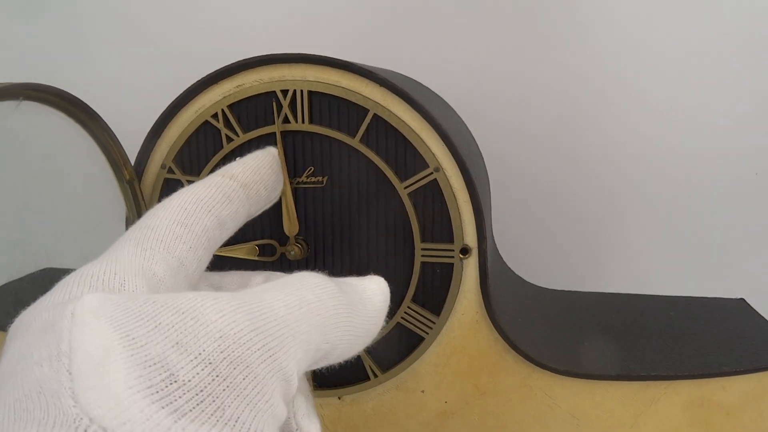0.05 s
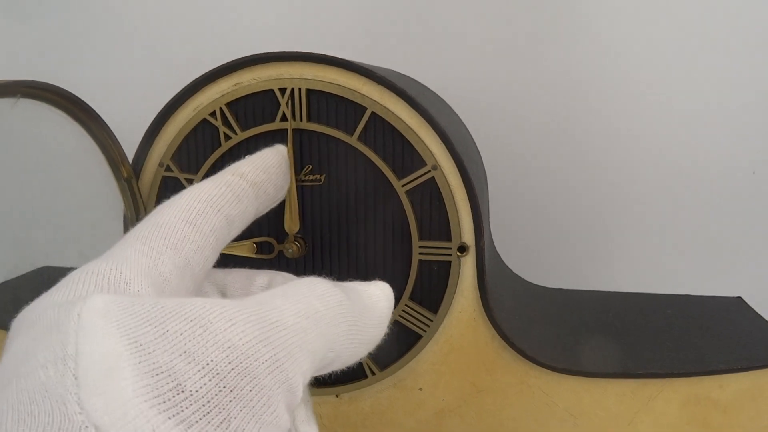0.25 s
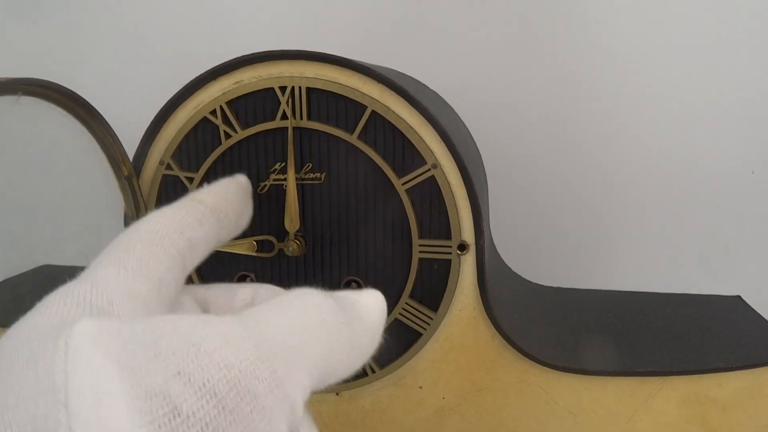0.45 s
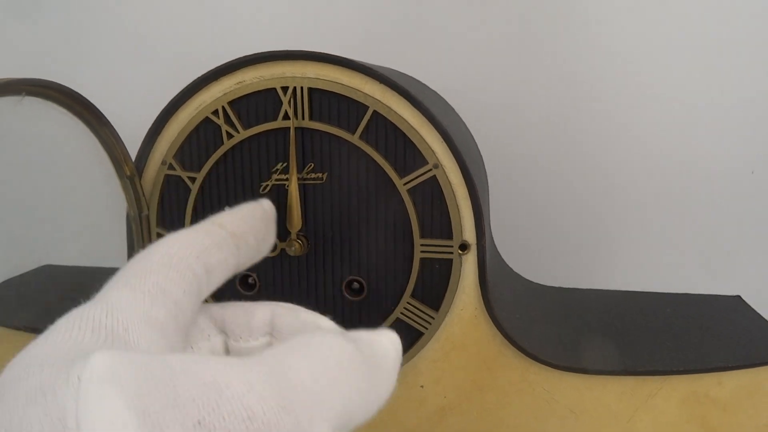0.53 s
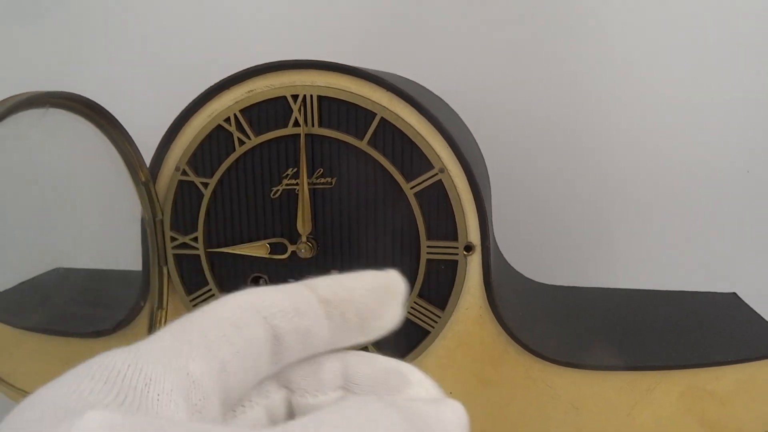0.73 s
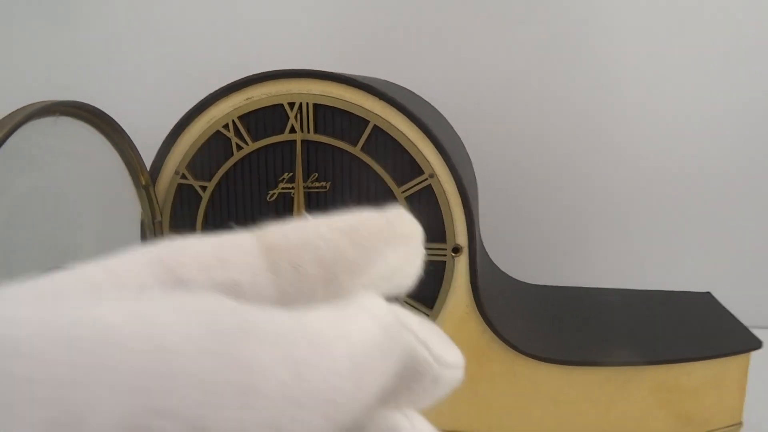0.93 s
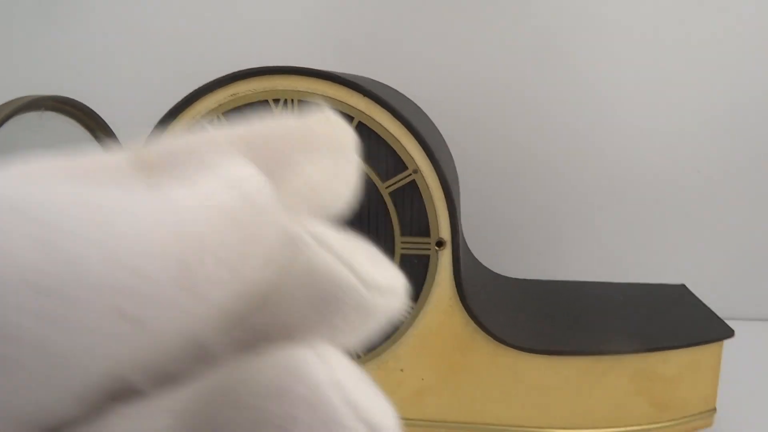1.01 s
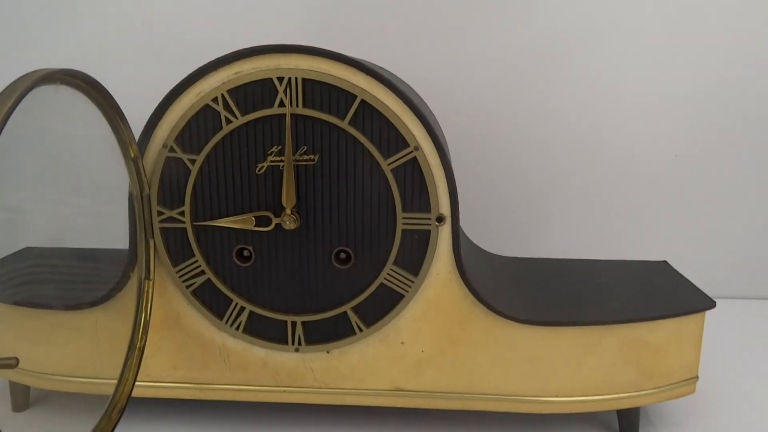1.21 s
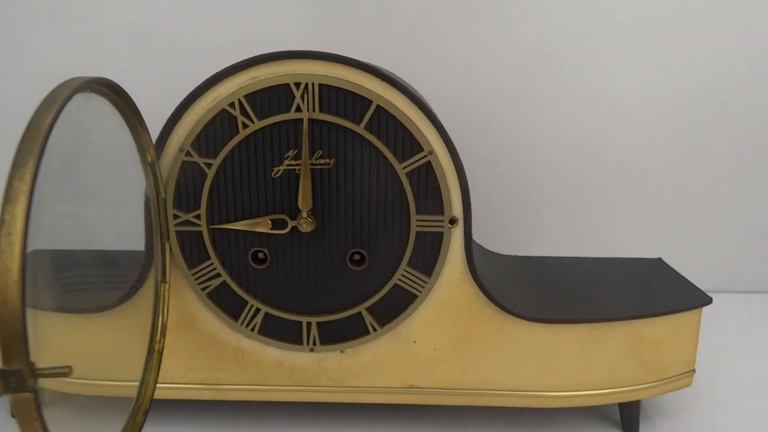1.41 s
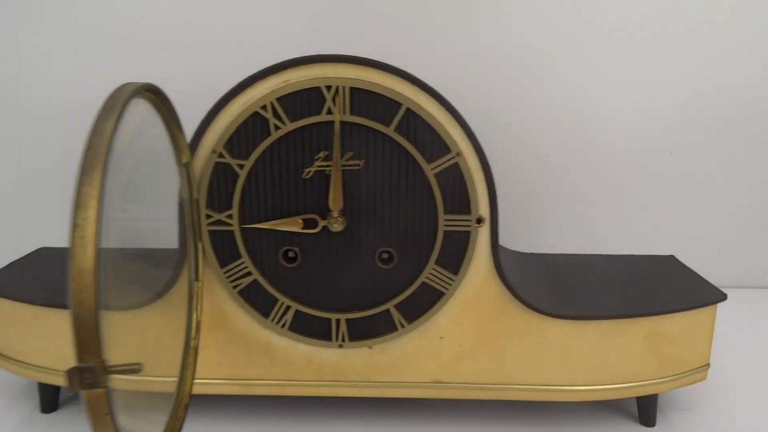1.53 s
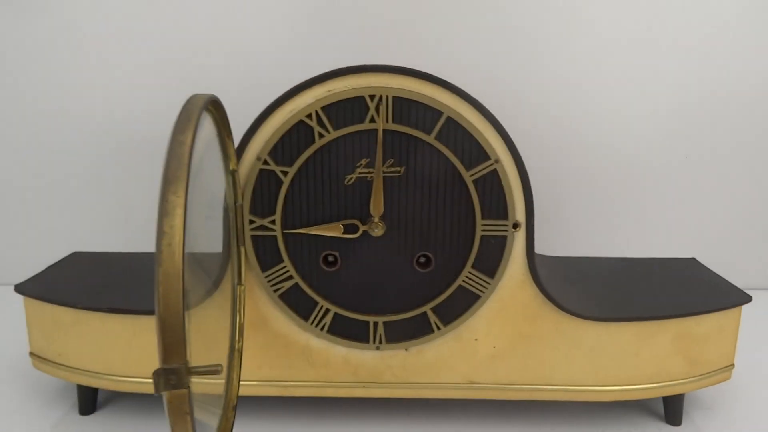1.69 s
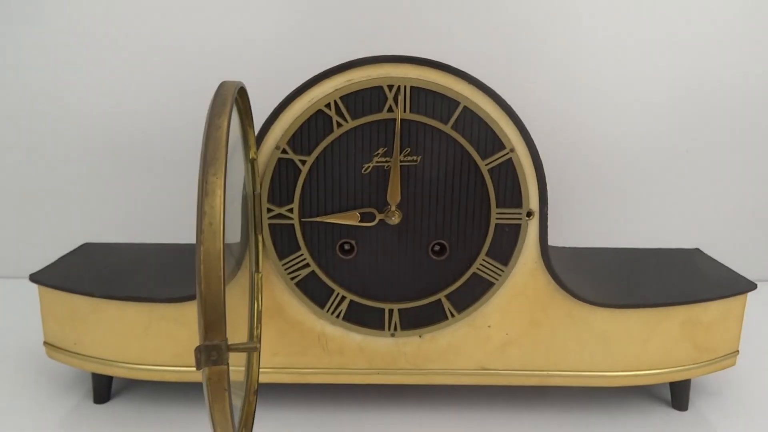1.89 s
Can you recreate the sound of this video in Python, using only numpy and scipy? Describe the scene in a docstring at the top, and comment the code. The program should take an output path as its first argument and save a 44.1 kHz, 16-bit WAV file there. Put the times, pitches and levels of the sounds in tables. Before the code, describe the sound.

A mantel clock's mechanism gives a sharp, rattling metallic click at about 0.2 seconds, with a tiny high squeak and a short ring. From 0.4 seconds it ticks faintly, four or five times a second. The glass door's hinge makes a lighter double click near 1.4 seconds and a soft knock at 1.75. A low hum and a very faint whirr with high chirps lie underneath in the small quiet room.

```python
"""A small quiet room with a low hum, where a gloved finger sets the minute hand of a wooden mantel clock.
A lever inside slips, drops, rattles and squeaks, ringing the metal plates and the case. The escapement,
the part that keeps time, ticks faintly. The glass door gives a quick double click as it starts to swing,
then knocks softly. A faint whirr with high chirps, probably a camera's focus motor, runs underneath."""
import sys
import numpy as np
from scipy import signal
from scipy.fft import rfft, irfft
from scipy.io import wavfile
from scipy.ndimage import uniform_filter1d

SR = 44100
rng = np.random.default_rng(int(sys.argv[2]) if len(sys.argv) > 2 else 0)


def store_wav(level_fs):
    """Save 16-bit WAV to argv[1]."""
    pcm = np.round(np.clip(np.atleast_2d(level_fs), -1, 1) * 32767)
    wavfile.write(sys.argv[1], SR, pcm.T.astype(np.int16))


N = 85995
T = np.arange(N) / SR
FREQS_HZ = np.maximum(np.fft.rfftfreq(N, 1 / SR), 1)
NARROW_DB, WIDE_DB = -14.5, -8.5  # how much a noise differs between the ears


def amp(db):
    """Turn decibels into a gain."""
    return 10 ** (np.asarray(db) / 20)


def curve(rows):
    """Join (time_s, level_db) points with straight lines."""
    return np.interp(T, *np.array(rows).T)


def colour(points):
    """A tone colour: how strong each frequency is compared with the others."""
    hz, db = np.array(points).T
    return amp(np.interp(np.log(FREQS_HZ), np.log(hz), db))


def noise(gain, width_db):
    """Stereo noise of level 1 in a given colour; the bass is alike in both ears."""
    mid, side = rfft(rng.standard_normal((2, N))) * gain
    side = side * amp(width_db) * FREQS_HZ / (FREQS_HZ + 100)
    out = irfft(np.array([mid + side, mid - side]), N)
    return out / out.std()


def wander(rate_hz):
    """A smooth random drift, mostly between -1 and 1."""
    knots = uniform_filter1d(np.repeat(rng.standard_normal(2048), 4), size=4)
    return 1.2 * np.interp(8 * rate_hz * T, np.arange(len(knots)), knots)


def strike(start_s, fade_s, rise_s):
    """The loudness of a hit: it rises fast and falls 60 dB in fade_s."""
    age = np.maximum(T - start_s, 0)
    return np.minimum(age / rise_s, 1) * np.exp(-np.log(1000) * np.minimum(age / fade_s, 10))


def ring(notes, hits):
    """An object's own notes fade away; each (start_s, level_db) hit tops up their energy."""
    out, first = np.zeros(N), int(hits[0][0] * SR)
    span = slice(first, first + N // 4)
    t = T[span]
    for hz, db, fade_s in notes:
        energy = sum((t > start) * amp(hit_db - 60 * np.maximum(t - start, 0) / fade_s) ** 2
                     for start, hit_db in hits)
        out[span] += amp(db) * np.sqrt(energy) * np.sin(2 * np.pi * hz * (t - t[0]))
    return out


# The hum's notes: pitch_hz, level_db
HUM_NOTES = [(70, -63.5), (106, -67)]
# How those notes swell: time_s, gain_db
HUM_SWELL = [(0, -4), (.6, -0.5), (1.95, 4)]
# The rustle's loudness: time_s, level_db
RUSTLE_LOUDNESS = [(0, -72.5), (.4, -66), (.6, -60.5), (.8, -61), (1.0, -64), (1.19, -69), (1.32, -59),
                   (1.55, -60.5), (1.95, -60.5)]
# The rustle's colour: pitch_hz, gain_db
RUSTLE_COLOUR = [(40, -5.5), (130, -3), (220, -9.5), (330, -1), (480, -11.5), (900, -19.5), (2000, -36)]
# The colour of the room's air: pitch_hz, gain_db
AIR_COLOUR = [(25, -9), (60, -12.5), (130, 1), (200, -10), (500, -14.5), (800, -9.5), (1200, -11),
              (2000, -15.5), (4000, -22), (9000, -23.5), (16000, -28.5)]

def background():
    """Still air, a hum that wavers in pitch, and a low rustle that comes and goes."""
    hum = 0
    for hz, db in HUM_NOTES:
        pitch_hz = hz * (1 + 0.028 * wander(9.7))
        hum += amp(db) * np.sqrt(2) * np.sin(2 * np.pi * np.cumsum(pitch_hz) / SR)
    rustle = amp(curve(RUSTLE_LOUDNESS)) * noise(colour(RUSTLE_COLOUR), WIDE_DB)
    air = amp(-63) * noise(colour(AIR_COLOUR), WIDE_DB)
    return amp(curve(HUM_SWELL)) * hum + rustle + air


# Pitches where the motor whirrs most: pitch_hz, width_hz, gain_db
WHIRR_PEAKS = [(1210, 200, 0), (2090, 384, 1), (3320, 280, -5), (4260, 190, -9), (5390, 460, -3.5),
               (9900, 690, -8)]
# The whirr's loudness: time_s, level_db
WHIRR_LOUDNESS = [(0, -73), (.38, -67.5), (.6, -64.5), (.85, -63), (1.1, -63.5), (1.42, -60.5),
                  (1.58, -63.5), (1.73, -59.5), (1.95, -62.5)]
# The chirps' loudness: time_s, level_db
CHIRP_LOUDNESS = [(0, -85), (.38, -87), (.42, -65), (.55, -63.5), (.8, -60), (.97, -62), (1.08, -74.5),
                  (1.27, -63.5), (1.47, -76), (1.65, -62), (1.95, -60)]
# Two chirps that stand out: start_s, level_db
STRONG_CHIRPS = [(0.551, -61), (0.5996, -51)]

def motor():
    """A small motor whirrs faintly, with an uneven string of high chirps."""
    chirp_hz, chirp_width_hz, chirps_per_s, strong_length_s = 9830, 260, 56, 0.011
    power = sum(amp(db) ** 2 / (1 + (2 * (FREQS_HZ - hz) / width) ** 2) for hz, width, db in WHIRR_PEAKS)
    whirr = amp(curve(WHIRR_LOUDNESS) + 1.8 * wander(18)) * noise(np.sqrt(power), WIDE_DB)
    chirp_count = np.cumsum(chirps_per_s * (1 + 0.303 * wander(14.83))) / SR
    pulses = np.sin(np.pi * chirp_count) ** 6 * amp(curve(CHIRP_LOUDNESS) - 1.5 * wander(18))
    for start, db in STRONG_CHIRPS:
        pulses += amp(db) * np.sin(np.pi * np.clip((T - start) / strong_length_s, 0, 1)) ** 2
    high_band = np.exp(-((FREQS_HZ - chirp_hz) / chirp_width_hz) ** 2)
    return whirr + pulses * noise(high_band, NARROW_DB)


# The lever's slips before it drops: start_s, level_db, fade_s
SLIP_CLICKS = [(0.1755, -49.5, 0.2), (.1872, -39.5, .005)]
# Their colour: pitch_hz, gain_db
SLIP_COLOUR = [(500, -20), (2000, 0), (3500, -1), (5500, -3), (9000, 1), (11000, -1), (16000, -19)]

def lever_slips():
    """The lever creeps to the edge of the shaped wheel it rests on, with small bright clicks."""
    clicks = sum(amp(db) * strike(start, fade_s, rise_s=0.0003) for start, db, fade_s in SLIP_CLICKS)
    return clicks * noise(colour(SLIP_COLOUR), NARROW_DB)


# The falling lever's hits: start_s, ring_gain_db, crack_gain_db
LEVER_HITS = [(0.2016, -10, -4), (.2036, -2, -1), (.2080, 2.5, -0.5), (0.2205, 1, -4.5)]
# The notes of the plates and case: pitch_hz, gain_db, fade_s
CASE_NOTES = [(161.3, -15.5, 0.071), (414.3, -18.5, 0.22), (650, -11.5, 0.11), (672.7, -17.5, 0.18),
              (810, -17, 0.14), (1102, -10, 0.043), (1254, -21, 0.57), (1443, -9, 0.18), (1505, 1, 0.04),
              (1674, -13, 0.13), (1806, -2.5, 0.08), (1831, 1.5, 0.088), (1969, -15, .08),
              (2461, -11.5, 0.12), (3178, 1, 0.026), (3795, -12, 0.063)]
# The colour of each sharp crack: pitch_hz, gain_db
CRACK_COLOUR = [(40, -38), (140, -18), (300, -38), (520, -15.5), (750, -13), (1100, -3.5), (1800, 2.5),
                (2700, -5), (5000, -13.5), (8000, -16), (11000, -14.5), (16000, -31)]
# The colour of the after-ring in the gears and hollow case: pitch_hz, gain_db
AFTER_RING_COLOUR = [(200, -12), (700, -16), (1000, -15.5), (1400, 2.5), (1850, -2.5), (2300, -12.5),
                     (5000, -22), (7500, -23.5), (10000, -26), (16000, -42)]

def lever_drop():
    """Each hit cracks, rings the plates and case, and leaves a blurred after-ring."""
    ring_db, crack_db, after_db = -29, -27, -39
    notes = ring(CASE_NOTES, [(start, ring_db + db) for start, db, _ in LEVER_HITS])
    crack_power = after_power = 0
    for start, ring_gain_db, crack_gain_db in LEVER_HITS:
        crack_power += (amp(crack_db + crack_gain_db) * strike(start, fade_s=0.074, rise_s=0.00013)) ** 2
        after_power += (amp(after_db + ring_gain_db) * strike(start, fade_s=0.27, rise_s=0.0067)) ** 2
    crack = np.sqrt(crack_power) * noise(colour(CRACK_COLOUR), NARROW_DB)
    after_ring = np.sqrt(after_power) * noise(colour(AFTER_RING_COLOUR), WIDE_DB)
    return notes + crack + after_ring


# The sliding lever's squeaks: start_s, length_s, pitch_hz, level_db
LEVER_SQUEAKS = [(0.207, 0.0034, 9900, -27.5), (0.207, 0.01, 8940, -30), (0.2203, 0.0043, 9800, -34),
                 (.2220, .012, 8950, -30.5), (0.235, 0.0064, 9840, -45)]

def lever_squeaks():
    """Metal slides on metal in short, nearly pure squeals, a little to the right."""
    edge_s, right_lead_db = 0.0024, 3.5
    out, wobble = 0, 1 + 0.008 * wander(400)
    for start, length, hz, db in LEVER_SQUEAKS:
        rise = np.clip((T - start) / edge_s, 0, 1)
        fall = np.exp(-np.maximum(T - start - length + edge_s, 0) / edge_s)
        out += amp(db) * rise * fall * np.sin(2 * np.pi * np.cumsum(hz * wobble) / SR)
    return out * amp([[-right_lead_db / 2], [right_lead_db / 2]])


# The clock's ticks: start_s, gain_db
TICK_BEATS = [(0.4, 0), (.6355, -1), (0.8517, 0), (1.0856, -1.5), (1.3030, -5), (1.5378, -2.5),
              (1.7536, -2.5)]
# Their colour: pitch_hz, gain_db
TICK_COLOUR = [(300, -15), (1500, 1.5), (3200, -3.5), (4500, -1), (6000, -4), (8800, 3), (12000, -4),
               (16000, -14)]

def ticking():
    """The escapement makes light, bright ticks inside the case."""
    beats = sum(amp(db) * strike(start, fade_s=0.046, rise_s=0.001) for start, db in TICK_BEATS)
    return amp(-49.5) * beats * noise(colour(TICK_COLOUR), NARROW_DB)


# The hinge's clicks: start_s, gain_db, treble_lift_db_per_octave
HINGE_CLICKS = [(1.3621, -2, 0.5), (1.3674, -5, 2)]
# The notes of the door's brass rim: pitch_hz, level_db, fade_s
RIM_NOTES = [(1570, -51, .04), (1907, -42, .04), (2177, -39.5, 0.058), (2340, -49, 0.043)]
# The clicks' colour: pitch_hz, gain_db
HINGE_COLOUR = [(200, -15), (800, -13.5), (1400, -10), (1800, -3.5), (2150, 3), (2700, -5), (6000, -9.5),
                (8000, -14.5), (10500, -10.5), (16000, -29)]

def door_hinge():
    """The hinge lets go with two quick clicks; the first rings the rim."""
    out = ring(RIM_NOTES, [HINGE_CLICKS[0][:2]])
    octaves_up = np.log2(np.maximum(FREQS_HZ, 1000) / 1000)
    for start, db, lift in HINGE_CLICKS:
        snap = strike(start, fade_s=0.035, rise_s=0.00038)
        tail = amp(-12.5) * strike(start, fade_s=0.23, rise_s=0.0044)
        hiss = noise(colour(HINGE_COLOUR) * amp(lift * octaves_up), NARROW_DB)
        out = out + amp(-35.5 + db) * (snap + tail) * hiss
    return out


# The colour of the door's knock: pitch_hz, gain_db
KNOCK_COLOUR = [(500, -18), (1200, -9), (2200, -12), (6000, -30)]

def door_knock():
    """The swinging door knocks softly, and the case rocks with a deep thump."""
    start_s, thump_hz, thump_s = 1.753, 45.3, 0.011
    age = T - start_s
    thump = amp(-47) * np.exp(-(age / thump_s) ** 2) * np.sin(2 * np.pi * thump_hz * age)
    knock = amp(-50) * strike(start_s, fade_s=0.14, rise_s=0.0096)
    return thump + knock * noise(colour(KNOCK_COLOUR), NARROW_DB)


def room(sound):
    """The walls add a short, soft echo whose treble dies first."""
    gap_s, echo_db = 0.0025, -16.5
    lows = 1 / (1 + (FREQS_HZ / 4000) ** 2)
    low_tail = noise(lows, width_db=-11) * strike(gap_s, fade_s=0.35, rise_s=0.0031)
    high_tail = noise(1 - lows, width_db=-26) * strike(gap_s, fade_s=0.29, rise_s=0.0023)
    tail = low_tail + 1.45 * high_tail
    tail /= np.sqrt(np.sum(tail ** 2) / 2)
    return sound + amp(echo_db) * signal.fftconvolve(sound, tail, axes=1)[:, :N]


def scene():
    """The clock in its room, over the quiet background and the motor."""
    squeaks, no_echo_share = lever_squeaks(), 0.28
    lever = lever_slips() + lever_drop() + (1 - no_echo_share) * squeaks
    clock = lever + ticking() + door_hinge() + door_knock()
    return background() + motor() + room(clock) + no_echo_share * squeaks


def record(dry):
    """Thin out the deepest bass and cut the highest treble."""
    low_hz, top_hz = 26, 16000
    thinned = signal.sosfilt(signal.butter(2, low_hz, "high", fs=SR, output="sos"), dry)
    return signal.sosfilt(signal.ellip(10, 0.2, 70, top_hz, fs=SR, output="sos"), thinned)


dry = scene()
out = record(dry)
store_wav(out)
```